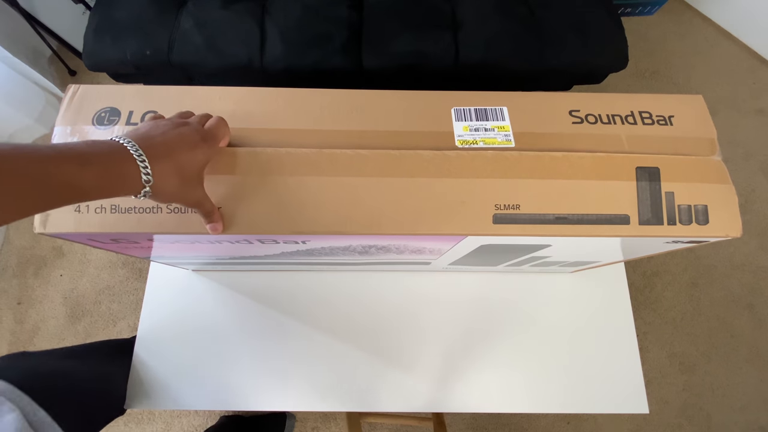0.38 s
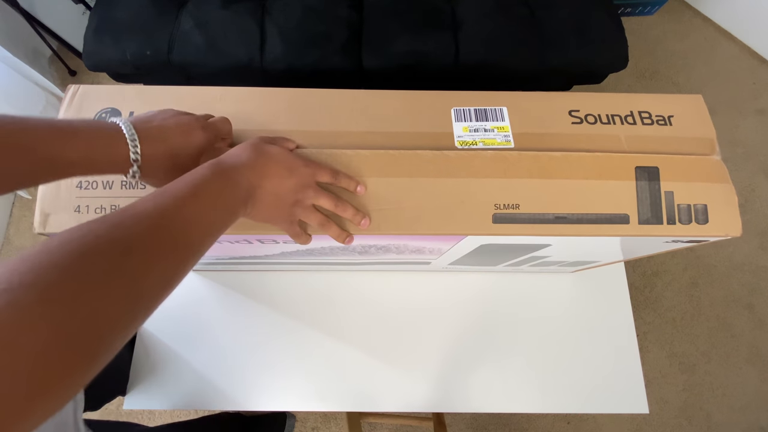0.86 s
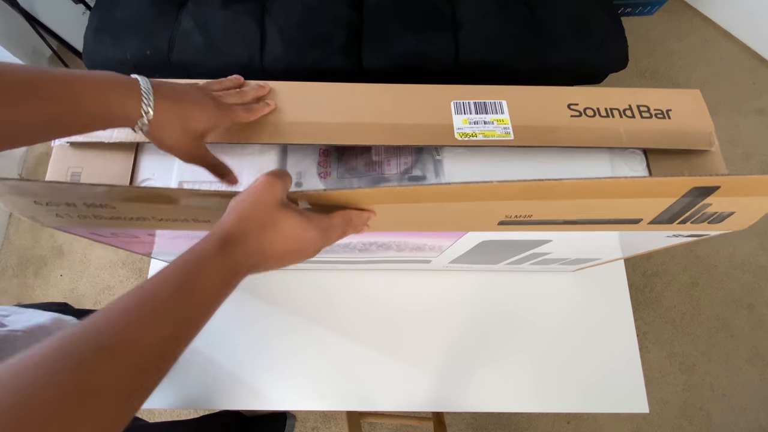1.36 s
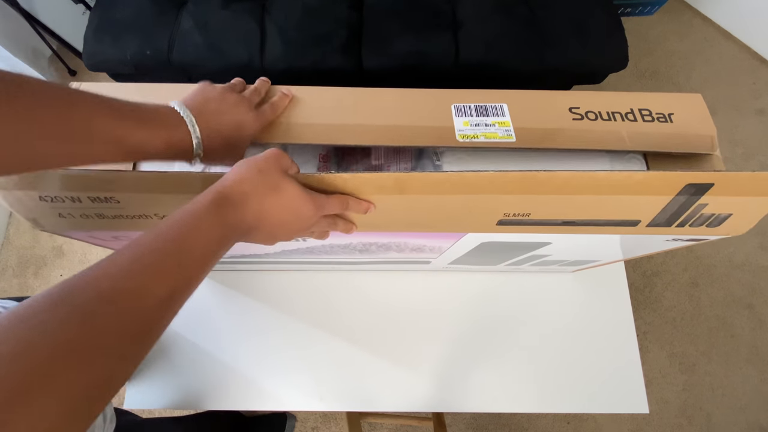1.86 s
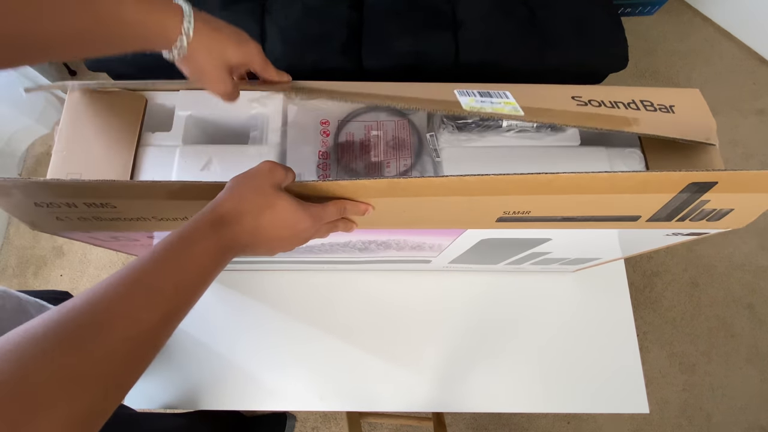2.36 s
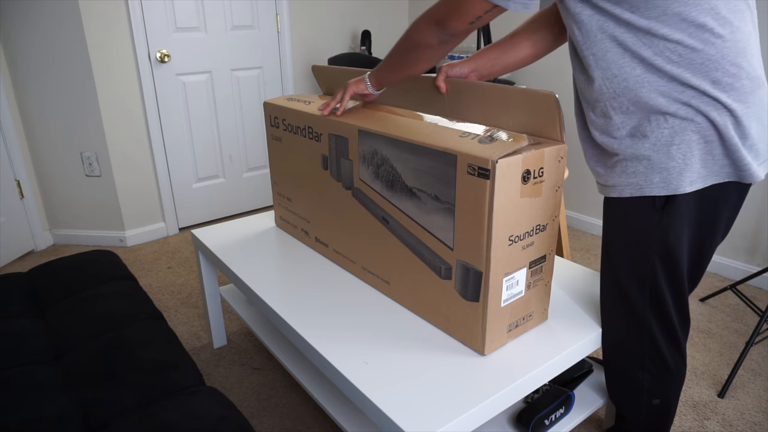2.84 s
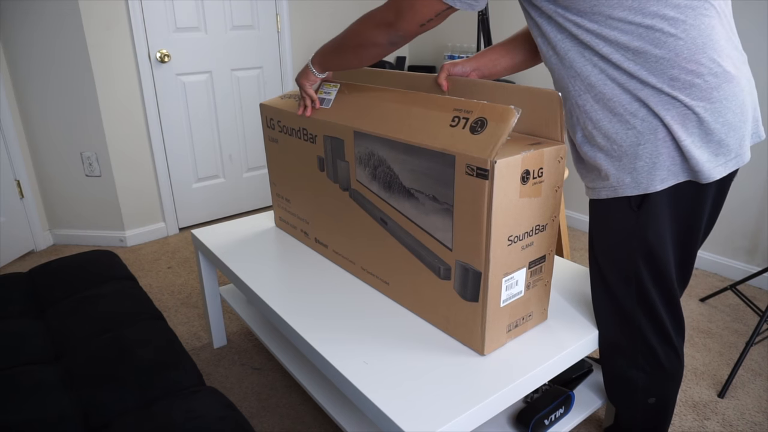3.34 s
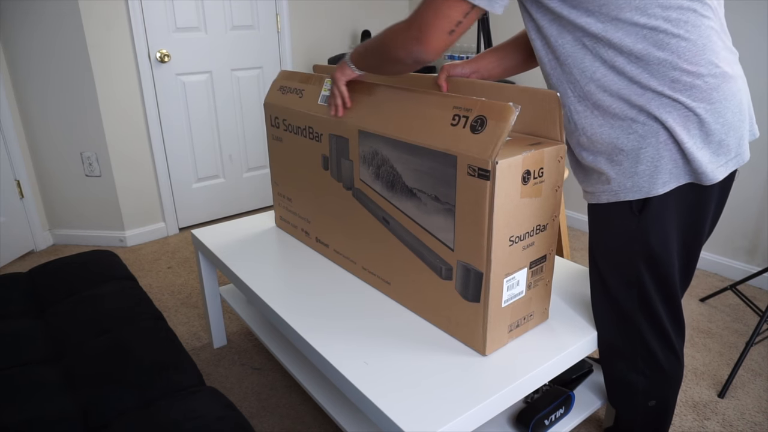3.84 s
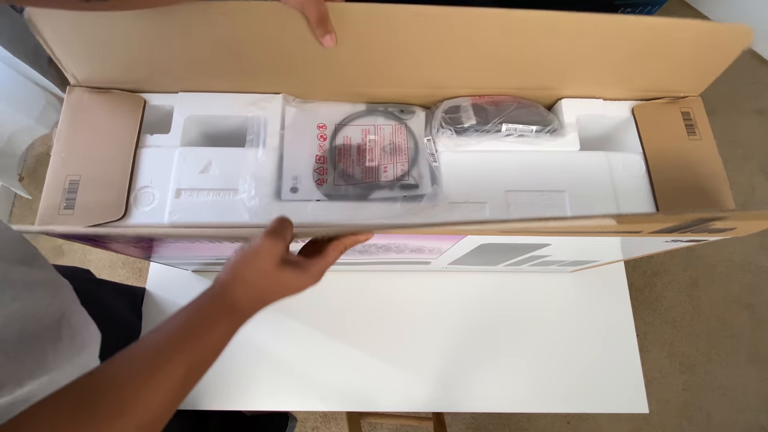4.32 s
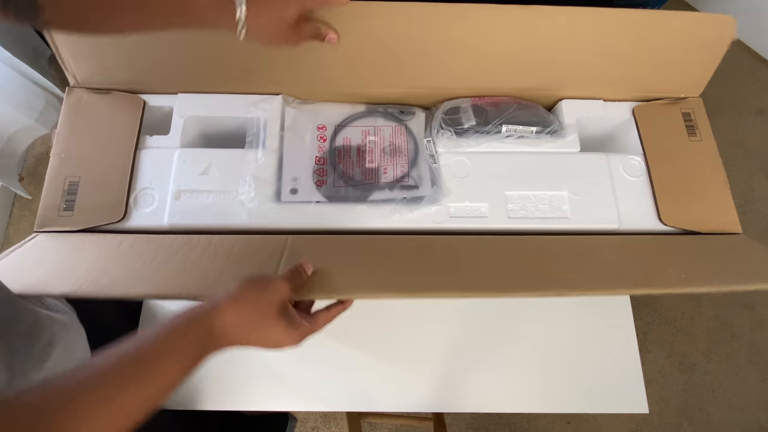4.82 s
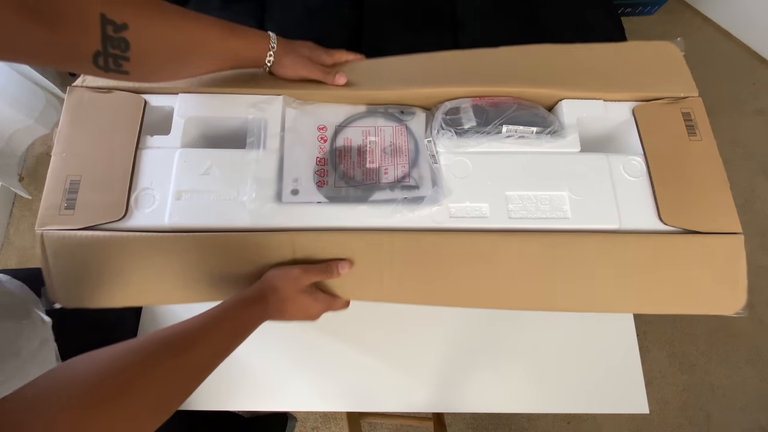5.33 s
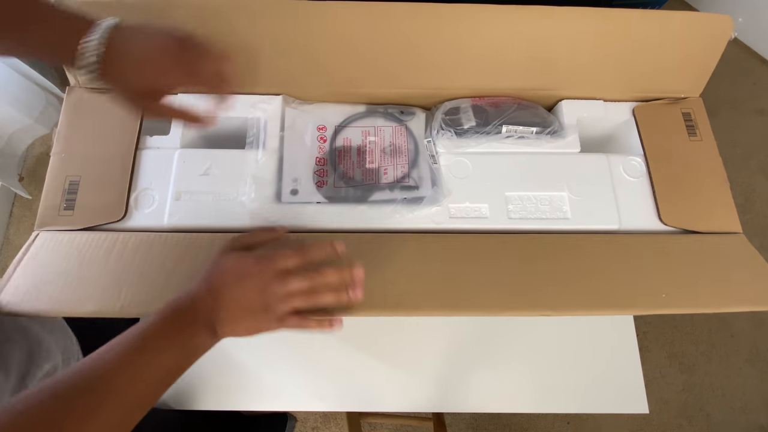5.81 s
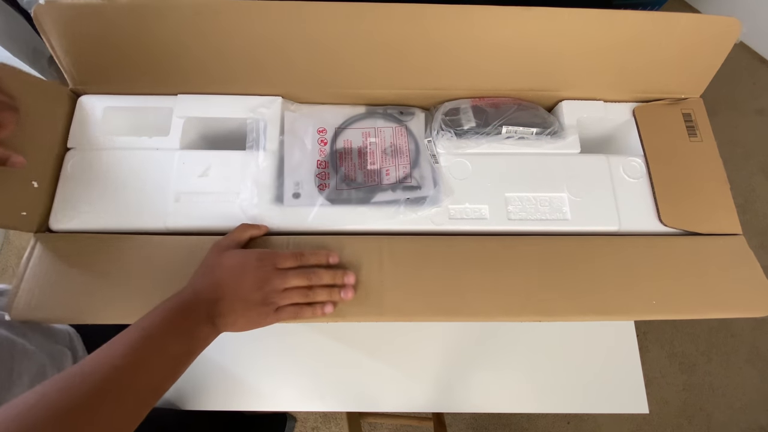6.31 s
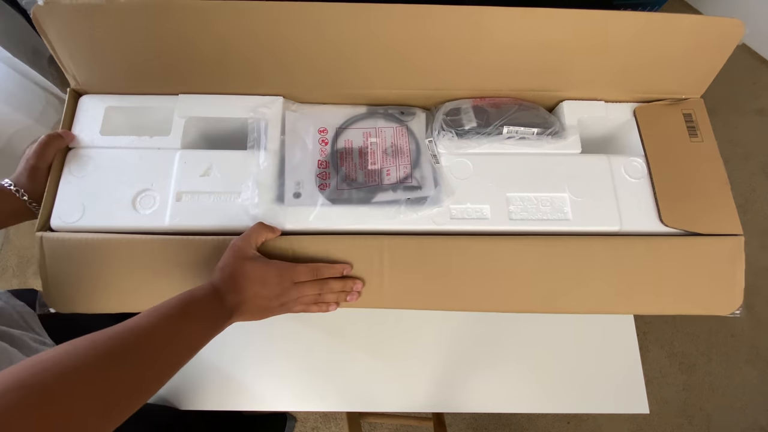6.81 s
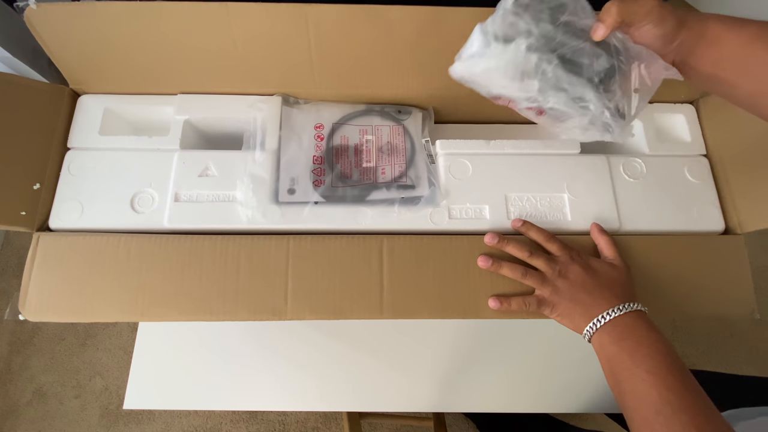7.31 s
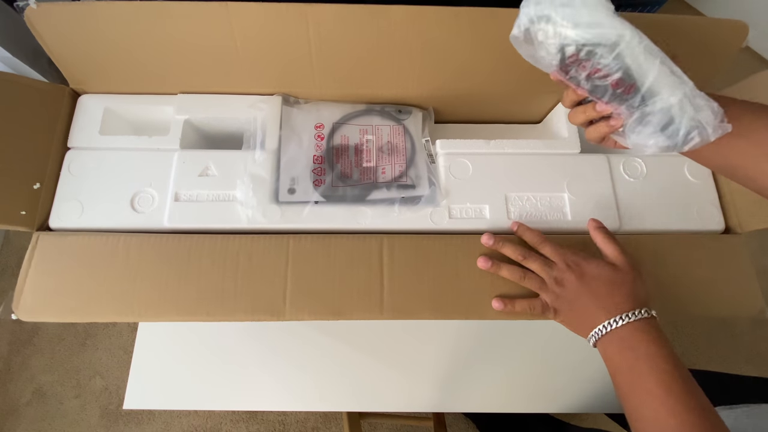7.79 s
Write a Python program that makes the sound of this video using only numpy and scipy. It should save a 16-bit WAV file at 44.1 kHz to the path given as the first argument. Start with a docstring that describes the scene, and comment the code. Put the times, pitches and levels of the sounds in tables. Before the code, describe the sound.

A long cardboard box is opened up close with hollow thumps, sharp tape pops and dry rubbing, before crinkly plastic wrap is lifted out.

```python
"""Hands open a long cardboard box on a low table in a small carpeted room, under a pair of spaced microphones.
From the start flaps knock and ring the hollow box, tape snaps free, palms and board edges rub; the hardest
blows fall near 1.3, 2 and 3.5 s. Soft low tones swell from 2.6 s as the box is leant on, a fold creaks at 5.3 s.
At 6.95 s the level dips briefly, the rubbing stops, and a plastic bag crackles as it is lifted out of the foam.
Blows ring decaying modes, slips are random grains shaped in colour, and random echo tails stand for the room."""
import sys
import numpy as np
from scipy import signal
from scipy.fft import rfft, irfft, next_fast_len
from scipy.io import wavfile
from scipy.ndimage import uniform_filter1d

SR = 44100
rng = np.random.default_rng(int(sys.argv[2]) if len(sys.argv) > 2 else 0)


def boost(x):
    """Linear amplitude factor 10**(x/20) for a level x in decibels (scalar or array-like)."""
    u = np.asarray(x, float) / 20
    return 10 ** u


def wav_record(signal):
    """Record a signal, one row per channel, as 16-bit PCM in the file named by sys.argv[1]."""
    frames = np.transpose(np.atleast_2d(signal))
    bounded = np.clip(frames, -1, 1)
    # unit amplitude maps onto the largest positive 16-bit level
    quanta = np.round(bounded * 32767).astype(np.int16)
    wavfile.write(sys.argv[1], SR, quanta)


N = 349272
T = np.arange(N) / SR
LEFT_RIGHT = np.array([[1], [-1]])  # opposite signs at the two microphones
LAG_PER_DB = 6.5  # samples by which the far microphone lags, per dB of level difference
RISE_DB_PER_S, FALL_DB_PER_S = 182, 240  # how fast a stroke swells, and a stroke or grip fades
RUB_START_S, BAG_START_S = 0.338, 6.953  # the full rubbing lies between these, the bag after the second


def colour(x, points):
    """Shape the spectrum by (Hz, dB) points, to an rms of 1."""
    hz, db = np.transpose(points)
    n = x.shape[-1]
    size = next_fast_len(n)
    f = np.maximum(np.arange(size // 2 + 1) * SR / size, 1)
    gain = boost(np.interp(np.log(f), np.log(hz), db))
    y = irfft(rfft(x, size) * gain, size)[..., :n]
    return y / np.sqrt(np.mean(y ** 2))


def band(x, hz, width):
    """Two-pole resonance."""
    return signal.lfilter(*signal.iirpeak(min(hz, 18000), max(hz / width, .2), fs=SR), x)


def walk(rate):
    """Random levels, rate of them a second, joined by straight slopes."""
    k = int(SR / rate)
    held = np.repeat(rng.standard_normal(N // k + 1), k)
    return 0.75 * uniform_filter1d(held, k)[:N]


def grains(rate, spread_db, hiss, unlike):
    """Slips at random moments and places over friction noise; each reaches the right microphone with its own lag."""
    when, size = rng.random(N), rng.exponential(size=N)
    sign, spot = rng.standard_normal((2, N))
    i = np.flatnonzero(when < rate / SR)
    strength = boost(spread_db * np.minimum(size[i], 3)) * sign[i]
    clicks = np.zeros((2, N))
    for row, lag in zip(clicks, (0, 12.0 + 9.8 * spot[i])):  # samples
        np.add.at(row, np.clip(i + lag, 0, N - 1).astype(int), strength)
    mid, side = rng.standard_normal((2, N))
    return clicks / clicks.std() + hiss * (mid + unlike * side * LEFT_RIGHT)


def place(x, pan_db):
    """The nearer microphone hears it louder and earlier."""
    i, side_db = np.arange(len(x)), .5 * LEFT_RIGHT * pan_db
    return boost(side_db) * np.array([np.interp(i + LAG_PER_DB * s, i, x) for s in side_db])


def add(out, s, x, pan_db):
    """Mix one event in at its time."""
    i = int(s * SR)
    y = place(x, pan_db)[:, max(-i, 0):N - i]
    out[:, max(i, 0):max(i, 0) + y.shape[1]] += y


def strokes(table, rise_db_per_s=RISE_DB_PER_S):
    """Each row swells, holds and fades at set rates; the strongest one rules. Gains of both columns."""
    s, hold, *columns = np.transpose(table)[:, :, None]
    t = T[::64]
    before, after = np.maximum(s - t, 0), np.maximum(t - s - np.abs(hold), 0)
    off_db = rise_db_per_s * before + FALL_DB_PER_S * after
    return [np.interp(T, t, boost((db - off_db).max(axis=0))) for db in columns]


# Blows on the box, close under the microphones. Each row: start in seconds, level in dB, strongest tone in Hz,
# thump under 150 Hz in dB against the level, slap near 2 kHz in dB against the level.
BLOWS = [(0.0, -12, 470, -9, -6), (0.442, -19.5, 335, -4.5, -10), (0.652, -29, 330, -29, -4),
         (0.779, -19.5, 164, -38, -7), (0.811, -17.5, 182, -8.5, 1), (0.969, -25.5, 700, -28, -40),
         (0.987, -30, 940, -26, -17), (1.039, -19, 456, -27, -4), (1.051, -23.5, 490, -32, -5),
         (1.067, -24, 604, -24, 3), (1.185, -31.5, 170, -6, -25), (1.199, -24, 940, -23, -11),
         (1.286, -8, 875, -11, -1), (1.298, -7.5, 787, -24, -0.5), (1.308, -7.5, 248.6, -8.5, -5),
         (1.628, -32, 170, 1.5, -1), (1.796, -24.5, 370, -33, -12), (1.849, -26, 610, -20, 2.5),
         (1.862, -27.5, 334, -5.5, -12), (2.017, -2.5, 767, -36, -0.5), (2.024, -1.5, 291, -10.5, -32),
         (2.036, -10, 292, -4.5, -30), (3.328, -28.5, 795, -20, 1), (3.339, -33, 880, -17, 8),
         (3.496, -5.5, 590, -4.5, -2), (3.501, -6.5, 980, -30, 2), (3.508, -10, 235, -15, -22),
         (3.795, -41, 304, -9, -1), (4.391, -10, 628, -54, 6.5), (4.405, -22, 860, -45, 10),
         (4.617, -27.5, 810, -21.5, -4), (4.639, -30, 550, -19, 1), (4.675, -33, 640, -24, -22),
         (4.727, -25, 640, -13, -33), (4.879, -32.5, 820, -27, -30), (4.973, -25.5, 270, -17, -13),
         (5.026, -32.5, 990, -29, -29), (5.113, -33, 960, -18, -7), (5.3, -34, 810, -14, 4),
         (5.433, -27, 343, -24, -7), (5.68, -42, 630, -16, -17), (5.982, -19, 434, -8.5, -4.5),
         (6.006, -25.5, 198, -6, -7), (6.107, -20.5, 825, -21, -23), (6.338, -27, 890, -8.5, -24),
         (6.434, -34.5, 730, -13, -5), (6.535, -30, 830, -30, -1), (6.627, -44, 330, -6, -18),
         (6.838, -33, 720, -15, -18), (7.097, -28.5, 800, -18, -12), (7.166, -24.5, 800, -21, -10),
         (7.686, -31, 1190, -11, -7)]
# Ringing modes of the hollow box. Each row: frequency in Hz, relative strength in dB,
# undamped t60 in seconds (the soft board shortens it in knocks()).
BOX_MODES = [(53.6, -8.5, 0.24), (76, 2.5, 0.19), (110.4, 3, 0.32), (170, 5, 0.33), (261.7, 0, 0.36),
             (292, 4.5, 0.29), (400.5, 2, 0.14), (502, -0.5, 0.18), (622, -2.5, 0.059), (757, 6, 0.038),
             (793, -8.5, 0.12), (858, -3, 0.075), (991, -2, 0.13), (1070, -10.5, 0.065)]


def knocks(pan_db):
    """A flap lands with a push and a short rattle; treble arrives first, modes near its tone ring, panels thud."""
    out, t = np.zeros((2, N)), T[:8192]
    hz, mode_db, t60 = np.transpose(BOX_MODES)[:, :, None]
    low = hz[:, 0] < 150
    f = np.arange(len(t) // 2 + 1) * SR / len(t)
    panel = signal.butter(4, [200, 1000], "band", fs=SR, output="sos")  # the span in which the panels thud
    for s, db, tone_hz, thump_db, slap_db in BLOWS:
        pan = pan_db[int(s * SR)]
        rattle_ms = max(6.5 + 0.156 * db, 1)  # softer blows rattle shorter
        luck = rng.standard_normal((2, len(BOX_MODES), 1))
        rattle = rng.standard_normal(len(t)) * np.exp(-(t * 1000 / rattle_ms) ** 2)
        contact = (t == 0) + 0.85 * rattle / np.sqrt(np.sum(rattle ** 2))
        # bending waves carry the bass slower: f Hz is late by lag * sqrt(1000 / f)
        lag = 1.15 * rattle_ms / 1000  # seconds at 1 kHz
        push = irfft(rfft(contact) * np.exp(-2j * np.pi * 2 * lag * np.sqrt(1000 * f)), len(t))
        # modes fall off by 11 dB per octave from the tone of the blow, give or take the spot hit
        near_db = 2.0 * luck[0] - 11. * np.abs(np.log2(hz / tone_hz))
        # modes take a few cycles to build; the board damps them, so the ring is short
        build = 1 - np.exp(-t * hz / 0.42)
        decay = boost(-60 * t / (np.where(hz < 150, .6, .4) * t60))
        wander = .015 * luck[1]
        ring = np.sin(2 * np.pi * hz * (1 + wander) * t) * build * decay * boost(mode_db)
        high_ring = (ring * boost(near_db) * np.sqrt(hz))[~low].sum(axis=0)
        modes = signal.fftconvolve(push, high_ring)[:len(t)]
        thud = band(signal.sosfilt(panel, push), tone_hz, tone_hz)
        slap = band(band(contact, 1600.0, 1600.0), 1950.0, 1860.0)
        thump = ring[low].sum(axis=0)
        body = boost(-4.5) * modes / np.abs(modes).max() + boost(-1.5) * thud / np.abs(thud).max()
        # started early, so that the tone of the blow arrives on time
        add(out, s - .001 - lag * np.sqrt(1000 / tone_hz), boost(db) * body, pan)
        add(out, s - .001, boost(db + slap_db) * slap / np.abs(slap).max(), pan)
        add(out, s - .004, boost(db + thump_db) * thump / np.abs(thump).max(), pan / 2)
    return out


def tint(x, hz, top_db):
    """A broad hump at the pitch of the sheet, and some sizzle on top."""
    hump = band(band(x, hz, 1.03 * hz), hz, 1.03 * hz)
    return hump + boost(top_db) * band(band(x, 9300.0, 7600.0), 9300.0, 7600.0)


# Tape, paper and plastic letting go under the hands. Each row: start in seconds, click peak in dB,
# centre in Hz, tear level in dB, gain of the sizzle around 9 kHz in dB.
RELEASES = [(0.3476, -8.5, 4940, -30, -30), (0.4365, -36, 4730, -39, -20), (0.54, -22.5, 6030, -46, -44.5),
            (0.559, -28.5, 2750, -52, -26), (0.571, -21, 4260, -38.5, -9), (0.7822, -21, 5700, -36, -24),
            (0.807, -44, 4400, -26.5, -13), (0.9213, -20, 4860, -39.5, -15), (1.036, -27, 2500, -41, -24),
            (1.126, -30, 3280, -40.5, -16), (1.224, -36, 3930, -46, -16), (1.281, 0, 5160, -23, -10),
            (1.294, -5, 3350, -43, 6), (1.4633, -28, 3150, -44.5, -40), (1.539, -24, 9050, -63, -15),
            (1.556, -23, 3080, -36, -13), (1.596, -20, 5000, -46, -16), (1.655, -25, 3240, -45, -16),
            (1.664, -17.5, 5050, -35.5, -19), (1.82, -22, 3870, -39, -19), (1.9149, -27, 4150, -37.5, -22),
            (2.0106, -0.5, 5750, -21, -4.5), (2.2018, -44, 4060, -50.5, 0), (3.204, -31.5, 2800, -47, -7),
            (3.262, -51, 5000, -70, -8), (3.324, -16, 5900, -42, -4), (3.481, -38, 4900, -34, -40),
            (3.4875, -36, 5800, -18, -17), (3.491, -6, 8300, -25, -3), (3.4937, -4.5, 2250, -28, -19.5),
            (3.798, -41, 2820, -45, -3), (4.389, -2, 3340, -27.5, -11), (4.725, -28, 7660, -49, -22.5),
            (5.498, -26.5, 5230, -49.5, -1), (5.98, -26, 2700, -40, -8), (6.103, -10, 3040, -37.5, -47),
            (6.107, -12.5, 5400, -42, -30), (6.3402, -21, 6240, -31, -26), (6.358, -9, 5700, -57, -7),
            (6.955, -24, 6270, -35.5, -22), (7.095, -29, 6000, -45, -16), (7.168, -19, 6800, -28, -14),
            (7.213, -38, 3200, -27, 0.5), (7.318, -21, 6100, -42, 6), (7.3516, -21, 5530, -33.5, -8.5),
            (7.443, -26, 5900, -35.5, -38), (7.476, -26, 7000, -35, 1), (7.6123, -17, 2130, -37.5, 8),
            (7.624, -31, 8040, -37, 2), (7.693, -14.5, 10400, -42, -14), (7.72, -21, 5560, -25.5, -5),
            (7.7738, -23, 5500, -34, -18), (7.8067, -12, 9500, -40, -17), (7.869, -33, 6000, -51, 1),
            (7.899, -18, 6040, -39, -1), (7.909, -19, 2900, -39, -8)]


def snaps(pan_db):
    """A stuck sheet lets go with one click, then a ragged tear that swells and dies away."""
    out, t = np.zeros((2, N)), T[:6000]
    u = t * 1000 / 19.2  # time in lengths of the tear, 19.2 ms
    for s, db, hz, tear_db, top_db in RELEASES:
        ragged = boost(5.14 * np.repeat(rng.standard_normal(len(t) // 40), 40))
        mid, side = tint(rng.standard_normal((2, len(t))), hz, top_db)
        swell = ragged * (1 - np.exp(-u / 0.091)) * np.exp(-u) / mid.std()
        click = tint(np.exp(-t / 0.00019) * np.cos(2 * np.pi * hz * t), hz, top_db)
        i = int(s * SR)
        add(out, s, boost(db) * click / np.abs(click).max() + boost(tear_db) * swell * mid, pan_db[i])
        # the tear runs along the sheet, so part of it differs between the microphones
        apart = boost(tear_db) * 0.45 * swell * side * LEFT_RIGHT
        out[:, i:i + len(t)] += apart[:, :N - i]
    return out


# Strokes of the hands over board and foam. Each row: start in seconds, hold in seconds,
# hiss of rubbing in dB, rumble of the board in dB.
HAND_STROKES = [(0, 0.019, -36.5, -36), (.345, 0.008, -41, -45), (.45, 0.015, -42.5, -59),
                (.56, 0.038, -49, -48), (.8, 0.033, -42, -36), (.9, 0.13, -48, -43),
                (1.05, 0.055, -43, -48), (1.15, 0.068, -56, -43), (1.35, 0.16, -68, -43),
                (1.55, 0.12, -46.5, -49), (1.68, 0.044, -51, -62), (1.84, 0.012, -44, -37.5),
                (1.92, 0.037, -44.5, -54), (2.05, 0.2, -61, -52), (2.49, .38, -51.5, -82),
                (2.93, 0.062, -44, -53), (3.05, 0.38, -52, -58.5), (3.34, 0.029, -56, -46.5),
                (3.55, 0.12, -53.5, -40.5), (3.7, 0.14, -55.5, -48), (3.9, 0.22, -43.5, -58.5),
                (4.35, 0.33, -45.5, -53), (4.74, 0.0097, -48.5, -44.5), (4.86, 0.076, -49, -51),
                (5.03, 0.084, -48.5, -47), (5.16, 0.15, -53, -51.5), (5.29, 0.13, -50.5, -53.5),
                (5.55, 0.12, -73, -53.5), (5.64, 0.037, -61, -50), (5.71, 0.0077, -41, -47.5),
                (5.8, 0.096, -59.5, -50.5), (5.99, 0.04, -52.5, -48), (6.25, 0.034, -50.5, -61),
                (6.35, 0.0079, -39.5, -41), (6.43, 0.037, -53.5, -63), (6.53, 0.1, -54.5, -74),
                (6.68, 0.12, -51.5, -72), (6.77, 0.11, -74, -54)]
# Colour of the rubbing as heard, with a narrow hole near 12 kHz.
# Each row: frequency in Hz, relative density in dB per Hz.
RUB_COLOUR = [(590, -0.5), (1000, -1.5), (3300, -2), (10200, -4.5), (11300, -10), (12000, -119),
              (12800, -9.5), (14200, -5.5), (15300, -13), (16000, -24)]
# Colour of the board or foam rumbling under the hands. Each row: frequency in Hz, relative density in dB per Hz.
BOARD_COLOUR = [(100, -20), (170, -2.5), (224, -4.5), (296, 3), (378, -3), (550, -3.5), (684, -2.5),
                (920, 0), (1290, -9.5), (1800, -15), (2340, -12), (3960, -120)]


def handling():
    """Rubbing hisses in fine grains, and coarser slips rumble in the board, under shared stutter."""
    hiss_gain, board_gain = strokes(HAND_STROKES)
    first_alone = strokes(HAND_STROKES[:1])[0] / hiss_gain  # at the start only the first stroke sounds
    on = np.where(T < RUB_START_S, first_alone, T < BAG_START_S)
    stutter = walk(40)
    hiss = colour(grains(1700.0, 4.3, 1.0, 0.64), RUB_COLOUR) * boost(2.3 * stutter)
    board = colour(grains(250., 5.7, 0.55, 0.28), BOARD_COLOUR) * boost(4.0 * stutter + 2.0 * walk(25))
    resting = T >= RUB_START_S  # resting hands never fall quite still
    hiss_gain = np.hypot(hiss_gain, resting * boost(-64))
    board_gain = np.hypot(board_gain, resting * boost(-58))
    return on * (hiss_gain * hiss + board_gain * board)


# Grips on the bag. Each row: start in seconds, hold in seconds, crackle in dB, rumble in dB.
BAG_GRIPS = [(6.953, 0.054, -43, -45), (7.025, 0.054, -37, -44.5), (7.095, 0.078, -34.5, -41.5),
             (7.168, 0.081, -33.5, -38), (7.3, 0.054, -40, -48.5), (7.345, 0.1, -39.5, -57),
             (7.44, .09, -36, -53.5), (7.545, 0.044, -40, -60), (7.612, .07, -36.5, -48.5),
             (7.69, 0.089, -33.5, -46.5)]
# Colour of the crackle as heard, with a narrow hole near 12 kHz and a steep upper limit near 16 kHz.
# Each row: frequency in Hz, relative density in dB per Hz.
CRACKLE_COLOUR = [(88, -40), (150, -14), (570, -6.5), (796, -5), (987, -9), (1130, 0.5), (3470, -1.5),
                  (5660, -3), (10600, -4), (11400, -7.5), (12200, -54), (12900, -5.5), (14300, -2.5),
                  (15400, -7), (15900, -60)]


def bag():
    """Thin film buckles: a dense fine crackle in bunches, and sparser crinkles that ping near 5.4 kHz over a body."""
    crackle, rumble = strokes(BAG_GRIPS, rise_db_per_s=900)  # the film gives way at once
    bunches = boost(2.6 * walk(90) + .8 * walk(25))
    film = colour(grains(6000., 2.0, 0.58, 0.43) * bunches, CRACKLE_COLOUR)
    fold = rng.standard_normal(400) * np.exp(-T[:400] / 0.0014)  # each crinkle is a short run of buckles
    pops = signal.fftconvolve(grains(420., 2.6, 0, 0), fold[None], axes=1)[:, :N]
    pops = pops / pops.std()
    ping = 2.0 * boost(4.4 * walk(6.3)) * band(pops, 5400.0, 870.0)
    body = 2.3 * boost(7.9 * walk(9)) * band(pops, 1740.0, 1000.0)
    crinkles = ping + body + 0.83 * colour(pops, CRACKLE_COLOUR)
    foam = colour(grains(400., 4.0, 0.31, 0.18), BOARD_COLOUR)
    crackle = np.hypot(crackle, boost(-46.5))  # a faint crackle between grips
    return (T >= BAG_START_S) * (crackle * (film + boost(-6.5) * crinkles) + rumble * foam)


# Board dragged over board, singing in one panel. Each row: start in seconds, length in seconds,
# centre in Hz, width of each resonance stage in Hz, level in dB.
DRAGS = [(3.326, 0.055, 1460, 1770, -43), (3.497, .04, 1950, 1600, -26.5), (4.79, 0.12, 866, 160, -48.5),
         (4.887, 0.13, 196, 60, -46), (5.023, .05, 940, 200, -44.5), (6.344, .12, 131, 40, -45.5),
         (6.616, .045, 326, 80, -53), (6.762, 0.081, 216, 90, -51.5), (6.837, 0.084, 724, 490, -53)]


def scrapes(pan_db):
    """Uneven slips excite one resonance for as long as the drag lasts."""
    out = np.zeros((2, N))
    for s, length, hz, width_hz, db in DRAGS:
        slips = rng.standard_normal(8000) * boost(4.0 * np.repeat(rng.standard_normal(80), 100))
        u = np.linspace(0, 1, int(length * SR))
        tone = band(band(slips, hz, width_hz), hz, width_hz)[-len(u):]
        swell = np.sin(np.pi * u ** 0.84) ** 0.9
        add(out, s, boost(db) * swell * tone / tone.std(), pan_db[int(s * SR)])
    return out


# A fold slipping in steps, left of centre. Each row: start in seconds, length in milliseconds,
# slips a second in Hz, level of the fundamental in dB.
FOLD_SLIPS = [(5.269, 8, 310, -34), (5.284, 18, 305, -34), (5.306, 14, 330, -33), (5.323, 12, 318, -35),
              (5.365, 36, 338, -31)]


def creak():
    """Short runs of even slips: a tone with a few weak overtones, starting and stopping quickly."""
    out = np.zeros((2, N))
    for s, ms, hz, db in FOLD_SLIPS:
        t = T[:int(ms * SR / 1000)]
        phase = 2 * np.pi * hz * t
        tone = np.sin(phase) + 0.45 * np.sin(2 * phase) + 0.14 * np.sin(3 * phase) + 0.065 * np.sin(4 * phase)
        add(out, s, boost(db) * np.sin(np.pi * t / t[-1]) ** 0.41 * tone, 3.5)
    return out


# Low tones that swell while the box is leant on, midway between the microphones. Each row: start in seconds,
# length in seconds, first frequency in Hz, last frequency in Hz, rms at the top of the swell in dB.
LEANS = [(2.637, 0.53, 80.5, 110.5, -47), (3.179, 0.1, 114, 113, -44.5), (3.951, 0.17, 130.4, 129, -41)]


def drone():
    """Soft gliding sine tones under a rounded swell."""
    out = np.zeros((2, N))
    for s, length, first_hz, last_hz, db in LEANS:
        u = np.linspace(0, 1, int(length * SR))
        phase = 2 * np.pi * np.cumsum(first_hz + (last_hz - first_hz) * u) / SR
        add(out, s, np.sqrt(2) * boost(db) * np.sin(np.pi * u) ** 2.0 * np.sin(phase), 0)
    return out


# Colour of the air booming inside the box. Each row: frequency in Hz, relative density in dB per Hz.
CAVITY_COLOUR = [(15, -56), (25, -38), (54, 9), (81, -7), (102, 13.5), (118, 8.5), (167, 8), (194, 0),
                 (220, -4), (290, -25), (480, -120)]


def cavity():
    """The air in the box booms with the smoothed rumble of the board, over a faint steady rest."""
    jolts = uniform_filter1d(strokes(HAND_STROKES)[1], int(0.14 * SR))  # averaged over 0.14 s
    gain = np.hypot(boost(-56), boost(-1) * jolts)
    return gain * boost(2.0 * walk(11)) * colour(grains(150., 2., 0.9, .45), CAVITY_COLOUR)


# Decay of the small carpeted room. Each row: frequency in Hz, t60 in seconds.
ROOM_DECAY = [(250, 0.3), (1000, 0.3), (3000, 0.16), (8000, 0.3), (14000, 0.015)]


def reflections():
    """Decaying reflections in octave bands; the bass is nearly alike at both microphones."""
    t, tail = T[:16000], 0
    hz, t60 = np.transpose(ROOM_DECAY)
    for f in 180 * 2 ** np.arange(7):
        mid, side = band(rng.standard_normal((2, len(t))), f, 0.51 * f)
        unlike = min(0.067 + f / 700.0, 1)
        fade = boost(-60 * t / np.interp(np.log(f), np.log(hz), t60))
        weight = max(f, 500) ** -.28  # level up to 500 Hz, then weaker toward the treble
        tail = tail + weight * (mid + unlike * side * LEFT_RIGHT) * fade
    tail = tail * (1 - np.exp(-(t / 0.000067) ** 2))
    # even out the chance peaks in the spectrum of the random tail
    spectrum = rfft(tail, 2 * len(t))
    power = np.mean(np.abs(spectrum) ** 2, axis=0)
    even = np.sqrt(uniform_filter1d(power, size=500) / uniform_filter1d(power, size=30))
    tail = irfft(spectrum * even)[:, :len(t)]
    return tail / np.sqrt(np.mean(np.sum(tail ** 2, axis=1)))


def room(dry, wet_db, count=4):
    """Echoes of the left signal crossfade through a cycle of random tails, so no tail's colour persists."""
    wet = 0
    for k in range(count):
        turns_away = np.abs((T / .13 - k + count / 2) % count - count / 2)  # one tail every 0.13 s
        share = np.sqrt(np.clip(1 - turns_away, 0, 1))
        wet = wet + signal.fftconvolve(dry[:1] * share, reflections(), axes=1)[:, :N]
    return dry + boost(wet_db) * wet


# Where the hands are busy under the pair. Each row: start in seconds, left minus right of the close sound in dB.
HAND_PLACES = [(0.0, 2.5), (0.35, 3.5), (0.95, 3), (1.2, 4.5), (1.27, -1), (1.4, 0.5), (1.72, 5), (2.0, 2),
               (2.7, 1.5), (3.3, 0.5), (3.6, -0.5), (4.3, 3.5), (5.43, 2), (6.31, 5), (7.0, 2.5),
               (7.59, 0.5), (7.92, 2)]


def hand_pan():
    """The hands drift in straight lines from place to place: left minus right in dB over time."""
    s, pan_db = np.transpose(HAND_PLACES)
    return np.interp(T, s, pan_db)


def scene():
    """All sources in the room; the level dips briefly, almost to silence, just before the bag."""
    pan_db = hand_pan()
    side_db = .5 * LEFT_RIGHT * pan_db
    rustle = (handling() + bag()) * boost(side_db)
    # the loud blows and snaps and the close small sounds each get their own share of room
    blows = room(knocks(pan_db) + snaps(pan_db), wet_db=-10.5)
    small = room(rustle + scrapes(pan_db), wet_db=-8.0)
    lean = boost(0.21 * side_db)  # near reflections lean the same way as the hands
    falling, rising = (BAG_START_S - .007 - T) / 0.013, (T - BAG_START_S) / 0.00084
    dip = np.clip(np.maximum(falling, rising), .05, 1)
    return ((blows + small) * lean + creak() + cavity() + drone()) * dip


def top_cut(x):
    """Nothing passes above the cut-off."""
    return signal.sosfilt(signal.butter(12, 16500, fs=SR, output="sos"), x)


def record(dry):
    """The deepest bass is filtered out, the loudest blows are rounded off, the highest treble is filtered out."""
    thin = signal.sosfilt(signal.butter(4, 43, "high", fs=SR, output="sos"), dry)
    rounded = np.tanh(1.099 * thin) / 1.22
    mix = signal.sosfilt(signal.ellip(6, .2, 50, 16200, fs=SR, output="sos"), rounded)
    return top_cut(mix)


dry = scene()
out = record(dry)
wav_record(out)
```